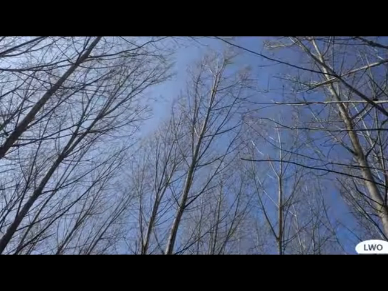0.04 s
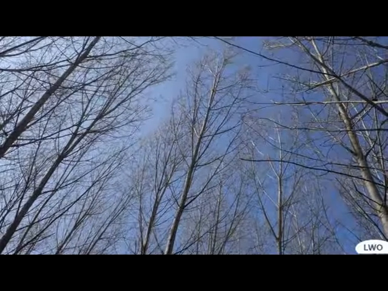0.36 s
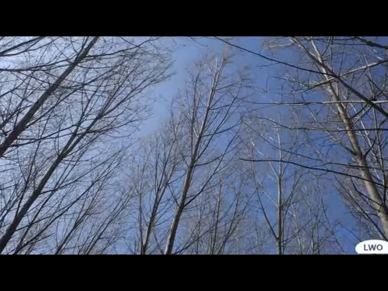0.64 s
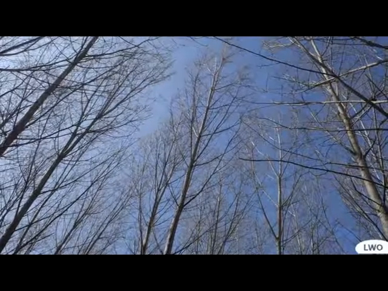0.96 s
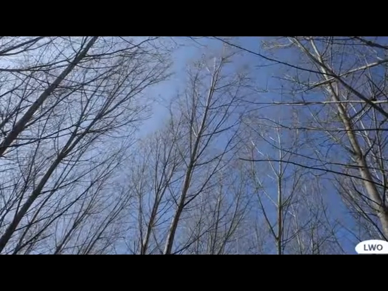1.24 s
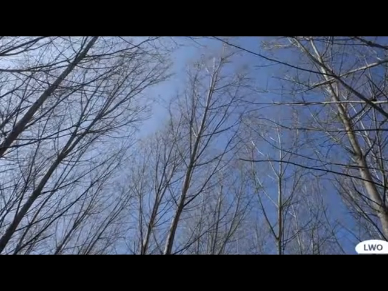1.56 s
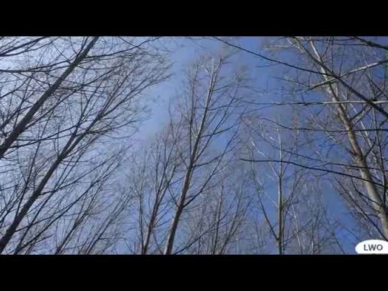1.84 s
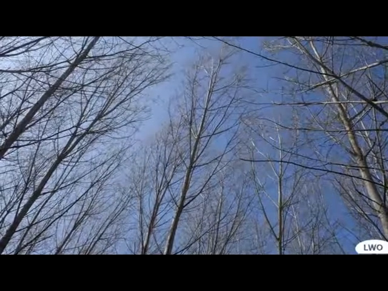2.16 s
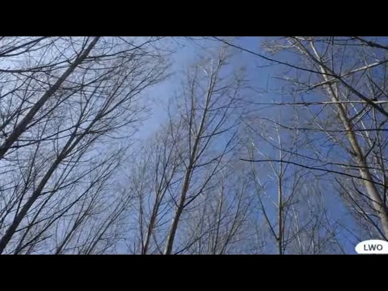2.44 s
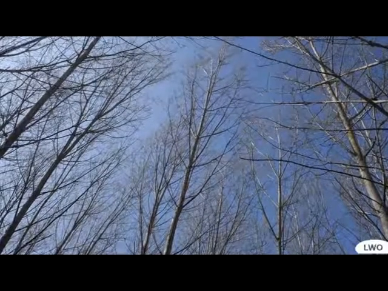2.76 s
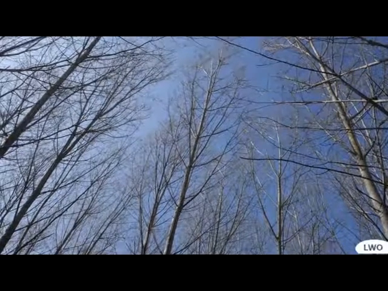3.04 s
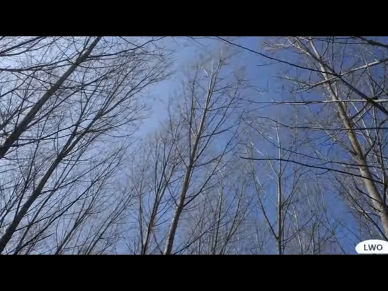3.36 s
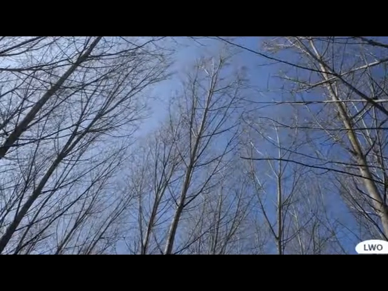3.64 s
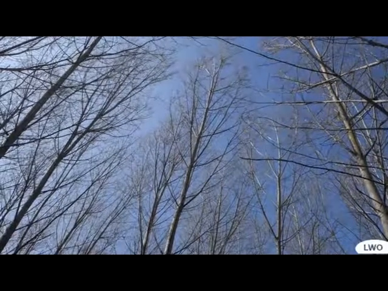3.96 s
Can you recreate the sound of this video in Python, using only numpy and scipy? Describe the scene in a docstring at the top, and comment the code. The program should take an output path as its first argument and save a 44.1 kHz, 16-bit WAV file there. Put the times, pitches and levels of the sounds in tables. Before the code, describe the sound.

Small birds chirp with short, high whistles and falling notes that ring among tall trees. The calls grow louder and busier as distant birds join, over a steady low rumble and a faint breeze.

```python
"""Small birds among tall bare trees. From the start: a distant rumble, coloured by its ground
reflection, the hiss of a light breeze, and calls that hook down onto a held whistle, many ending in
a falling slur. Twigs and trunks scatter each note into a long ringing tail. Faint high twitters pass
in the first second. From about 1.5 s the calls grow louder, and far birds, short pips and rough buzzes
stand out. Near 3.7 s one thin whistle sinks."""
import sys
import numpy as np
from scipy import signal
from scipy.fft import rfft, irfft
from scipy.io import wavfile
from scipy.ndimage import map_coordinates

SR = 44100
rng = np.random.default_rng(int(sys.argv[2]) if len(sys.argv) > 2 else 0)


def digitize_waveform(pressure):
    """Quantize a signal to 16-bit integers and store it at the path in sys.argv[1].

    Rows of a 2-D input are taken as channels; values are limited to [-1, 1].
    """
    field = np.atleast_2d(pressure).T
    bounded = np.clip(field, -1, 1)
    quanta = np.round(bounded * 32767).astype(np.int16)
    wavfile.write(sys.argv[1], SR, quanta)


N = 176400

# rumble spectrum: f/Hz, relative density/dB
RUMBLE_SPECTRUM = [(12, -18), (25, -22), (38, 0.5), (75, -0.5), (105, 0.5), (175, 1), (275, -1.5),
                   (350, -6), (480, -15), (700, -25), (1200, -65), (3000, -67)]
# rumble band gains: t/s, low/dB, middle/dB, upper/dB
RUMBLE_SWELL = [(0, 8, 3.5, 8.5), (.2, -5, 0, 2), (.45, 5, 2, -0.5), (.6, 0.5, 2.5, 1),
                (.85, 1, -3.5, -2.5), (1.25, 0, -0.5, 0), (1.7, -3, 1, -3.5), (2.2, -1, 1, -2),
                (2.6, 0.5, 2.5, -3.5), (2.9, 1.5, 0.5, 2.5), (3.35, -3.5, 1, 2), (4, -5, -0.5, -1.5)]
# soft drones in the rumble: peak t/s, f/Hz, Gaussian sigma/s, level/dB
DRONE_SWELLS = [(0.09, 95, 0.18, -49.5), (0.031, 272, 0.16, -45.5), (0.445, 264, 0.028, -44),
                (0.745, 166.7, 0.26, -49), (2.908, 316, 0.084, -54.5), (3.272, 273, 0.067, -54)]
# breeze spectrum: f/Hz, relative density/dB
BREEZE_SPECTRUM = [(30, -20), (90, -6), (180, 1.45), (350, 3), (700, 0), (1100, -3), (1600, -9),
                   (2300, -10), (2800, -14), (3400, -15), (5000, -17), (7500, -22), (10500, -26)]
# breeze, left-right likeness: f/Hz, correlation/1
BREEZE_CORRELATION = [(100, 1), (600, 0.74), (1100, 0.58), (2200, 0.18), (4000, 0.23), (10000, 0)]
# faint high sizzle: t/s, level/dB
SIZZLE_LEVEL = [(0, -98), (.13, -86), (.27, -83), (.5, -88), (.7, -100), (2.9, -100), (3.07, -87),
                (3.22, -82.5), (3.45, -103), (4, -100)]
# far birds, send to the wood: t/s, level/dB
FAR_LEVEL = [(0, -88), (1.6, -59), (2.1, -73), (2.45, -69), (2.75, -66), (3.05, -81), (3.6, -59), (4, -63)]
# rough distant twitters: t/s, f/Hz, length/s, level/dB
BUZZ_NOTES = [(1.763, 6000, 0.065, -72), (1.877, 5690, 0.06, -72), (2.205, 5830, .1, -72.5),
              (2.392, 5620, 0.065, -75), (2.584, 5480, 0.092, -70), (2.641, 4850, .1, -64.5),
              (2.707, 5900, 0.044, -69), (3.079, 5660, 0.045, -64), (3.358, 5200, 0.043, -70),
              (3.789, 4400, 0.078, -65)]
# faint high twitters: t/s, f/Hz, length/s, level/dB
TWITTER_NOTES = [(0.306, 7800, 0.043, -85), (.465, 7650, 0.05, -80), (.745, 7200, 0.038, -75)]
# thin sinking whistle: t/s, f/Hz, level/dB
THIN_CONTOUR = [(3.652, 8050, -79), (3.675, 7600, -73), (3.69, 7200, -74), (3.735, 6850, -70),
                (3.79, 6600, -73), (3.825, 6450, -71)]
# short plain notes: t/s, start f/Hz, end f/Hz, length/s, level/dB, pan (L-R)/dB
PIP_NOTES = [(1.751, 2760, 2720, 0.021, -67.5, 0), (1.927, 2780, 2740, 0.013, -64, 1),
             (2, 2780, 3130, 0.041, -73, -4), (2.502, 4020, 3980, 0.018, -59.5, 7),
             (2.559, 3030, 2830, 0.049, -67.5, -1), (3.197, 3893, 3825, 0.025, -58.5, 12),
             (3.251, 3090, 3110, 0.028, -66, 1), (3.574, 5150, 5330, 0.021, -64, 17),
             (1.208, 5900, 5030, 0.0091, -65, 0), (3.49, 3020, 2570, 0.012, -64.5, 3),
             (3.745, 3130, 2490, 0.027, -74, 0)]
# falling slurs: t/s, start f/Hz, end f/Hz, length/s, level/dB, echo send/dB
SLUR_NOTES = [(0.397, 4900, 3670, 0.04, -70, 6.5), (0.796, 4400, 3540, 0.03, -79, -2),
              (1.09, 5000, 3660, 0.041, -65, 5.5), (1.772, 4400, 3716, 0.03, -67, 4),
              (1.958, 5100, 3900, 0.032, -66, 4), (2.143, 4250, 3450, 0.028, -65, 2),
              (2.274, 4900, 4200, 0.0313, -65, 7.5), (2.42, 4950, 3650, 0.032, -59.5, 3.5),
              (2.633, 4900, 3900, 0.02, -63, 10.5), (2.665, 4800, 3900, 0.017, -63, 10),
              (2.862, 4900, 3950, 0.0332, -65, 5), (3.12, 4700, 3420, 0.045, -68, 3),
              (3.365, 5080, 3900, 0.035, -63, 4.5), (3.513, 3900, 3380, 0.026, -63.5, -1),
              (3.572, 4750, 3800, 0.022, -67, 1), (3.854, 4050, 3520, 0.025, -68, 0)]
# hooked calls: t/s, held f/Hz, length/s, level/dB, pan (L-R)/dB, echo send/dB,
# hook gain/(dB per octave above held f)
HOOKED_NOTES = [(0.02, 4450, 0.067, -72.5, 4, 3, -20), (0.141, 3990, 0.086, -72, 6, 0.5, -20),
                (0.322, 4070, 0.079, -67.5, -3, -2, -27), (0.356, 4950, 0.04, -69, 5, 7, 4),
                (0.719, 4380, 0.09, -67, 3, 5.5, 10), (0.774, 4000, 0.067, -74, 7, 4, -20),
                (1.052, 4950, 0.066, -71, 3, 8, -10), (1.2, 4000, .045, -68, 3, 4, -15),
                (1.405, 3970, 0.045, -61, 3, -2, -15), (1.445, 4000, .035, -59, 3, -6, -25),
                (1.559, 4340, .075, -58, 4.5, -10, 0), (1.724, 5650, 0.035, -66, 4, 6, -4),
                (1.835, 3920, 0.03, -65, 5, 2, -20), (1.911, 5170, 0.037, -69, 3, 3, 8),
                (1.935, 5670, 0.044, -67, -9, 5, -16), (2.074, 4330, 0.0624, -60, 7, 0.5, -10),
                (2.217, 4137, 0.051, -64.5, -7, 6, -10), (2.273, 4340, 0.08, -59, 3.5, -8.5, 4),
                (2.381, 4950, 0.036, -65.5, 8, 9.5, -10), (2.607, 4900, 0.045, -62, -5.5, 7, -1),
                (2.731, 3870, 0.07, -63, 9.5, -1, -10), (2.971, 4340, 0.075, -59, 5, -8, 5),
                (3.073, 5590, 0.029, -59.5, 7.5, -1.5, 0), (3.321, 5080, 0.058, -66, -4.5, -1.5, 6),
                (3.436, 3790, 0.078, -57.5, 12, -6, 3), (3.776, 4275, 0.058, -56.5, 7.5, -4, -2),
                (3.888, 5000, 0.034, -65, 7, -9, 4), (3.98, 3900, .04, -58, -4, 0, 3)]

TIME_S, BIN_HZ = np.arange(N) / SR, np.fft.rfftfreq(N, 1 / SR)
RUMBLE_LAG_S = 70e-6


def undb(db):
    """Decibels to gain."""
    return 10 ** (np.asarray(db) / 20)


def over_time(rows, col=1):
    """Time table column at every sample."""
    rows = np.array(rows)
    return np.interp(TIME_S, rows[:, 0], rows[:, col])


def over_frequency(rows):
    """Frequency table at every bin, on a log axis."""
    rows = np.array(rows)
    return np.interp(np.log(np.maximum(BIN_HZ, 1)), np.log(rows[:, 0]), rows[:, 1])


def walk(rate_hz, n):
    """Smooth random curve, spread near 1."""
    steps = rng.standard_normal(512)
    return map_coordinates(steps, [np.arange(n) / SR * rate_hz], order=3, mode="mirror")


def noise(gain):
    """Unit-rms noise with the given spectrum."""
    return irfft(rfft(rng.standard_normal(N)) * gain / np.sqrt(np.mean(gain ** 2)), N)


def narrow_noise(hz, sigma_hz):
    """Gaussian band of noise."""
    return noise(np.exp(-0.5 * ((BIN_HZ - hz) / sigma_hz) ** 2))


def lag_right(x, lag_s):
    """Stereo pair, right side delayed."""
    return np.array([x, irfft(rfft(x) * np.exp(-2j * np.pi * BIN_HZ * lag_s), N)])


def place(bus, start_s, note, pan_db=0, echo_db=0):
    """Add a note to left, right and echo send; pan sets level and arrival time."""
    i = int(start_s * SR)
    note = note[:N - i]
    lag_s = np.clip(13e-6 * pan_db, -80e-6, 80e-6)
    right = map_coordinates(note, [np.arange(len(note)) - lag_s * SR], order=3)
    gains = undb([pan_db / 2, -pan_db / 2, echo_db])
    bus[:, i:i + len(note)] += gains[:, None] * np.array([note, right, note])


def rumble(ground_delay_s=0.010995, ground_gain=0.42, gain_db=-48.5):
    """Far low noise, combed by its ground reflection; three bands swell over steady deep bass."""
    comb = np.abs(1 + ground_gain * np.exp(-2j * np.pi * BIN_HZ * ground_delay_s))
    spectrum = rfft(noise(undb(over_frequency(RUMBLE_SPECTRUM)) * comb))
    band = np.searchsorted([62, 110, 225], BIN_HZ)
    x = irfft(spectrum * (band == 0), N)
    for k in (1, 2, 3):
        x += irfft(spectrum * (band == k), N) * undb(over_time(RUMBLE_SWELL, k))
    return lag_right(undb(gain_db) * x, RUMBLE_LAG_S)


def drones():
    """Narrow swells in the distant rumble."""
    x = np.zeros(N)
    for peak_s, hz, sigma_s, db in DRONE_SWELLS:
        swell = undb(db) * np.exp(-0.5 * ((TIME_S - peak_s) / sigma_s) ** 2)
        x += narrow_noise(hz, sigma_hz=19.5) * swell
    return lag_right(x, RUMBLE_LAG_S)


def breeze(level_db=-58, pan_db=1.1):
    """Air hissing in the branches, wider in the treble."""
    gain = undb(over_frequency(BREEZE_SPECTRUM))
    correlation = over_frequency(BREEZE_CORRELATION)
    mid = irfft(rfft(noise(gain)) * np.sqrt((1 + correlation) / 2), N)
    side = irfft(rfft(noise(gain)) * np.sqrt((1 - correlation) / 2), N)
    return undb(level_db) * np.array([(mid + side) * undb(pan_db / 2), (mid - side) * undb(-pan_db / 2)])


def sizzle():
    """Thin high band that comes and goes twice."""
    return np.array([narrow_noise(hz=10730, sigma_hz=73) for _ in range(2)]) * undb(over_time(SIZZLE_LEVEL))


def wood(send, t60_s=1.15, build_s=0.02, trunk_share=0.23, gain_db=3.5):
    """Twigs scatter a dense tail, trunks return single echoes; one strong trunk echo answers late."""
    t = np.arange(2 * SR) / SR
    twigs = rng.standard_normal((2, len(t)))
    trunks = rng.standard_normal((2, len(t))) * (rng.random((2, len(t))) < 1 / 400) * np.sqrt(400)
    scatter = np.sqrt(1 - trunk_share) * twigs + np.sqrt(trunk_share) * trunks
    trunk_echo_db = 3.5 * np.exp(-0.5 * ((t - 0.11) / 0.004) ** 2)
    fade = undb(-60 * t / t60_s + trunk_echo_db) * (1 - np.exp(-t / build_s))
    response = scatter * fade / np.linalg.norm(fade)
    return undb(gain_db) * signal.fftconvolve(send[None], response, axes=1)[:, :N]


def sway(pair, shift_s=23e-6, rate_hz=50):
    """Echo paths shift slightly, so the tails flutter."""
    paths = [np.arange(N) + shift_s * SR * walk(rate_hz, N) for _ in pair]
    return np.array([map_coordinates(x, [path], order=3, mode="nearest") for x, path in zip(pair, paths)])


def perch(pair, t60_s=0.1, share=0.22):
    """Twigs close to the singers blur each note."""
    t = np.arange(int(t60_s * SR)) / SR
    fade = undb(-60 * t / t60_s)
    response = rng.standard_normal((2, len(t))) * fade / np.linalg.norm(fade)
    blur = signal.fftconvolve(pair, response, axes=1)[:, :N]
    return np.sqrt(1 - share) * pair + np.sqrt(share) * blur


def whistle(hz, envelope, edge_s=0.0034, fast_hz=83.7, slow_hz=55, flutter_db=1):
    """Near-pure bird tone, wavering in pitch and level."""
    n = len(hz)
    t = np.arange(n) / SR
    attack = np.minimum(t / edge_s, 1)
    release = np.sin(np.pi / 2 * np.minimum((n / SR - t) / edge_s, 1))
    waver = 1 + 0.0081 * walk(fast_hz, n) + 0.008 * walk(slow_hz, n)
    tone = np.sqrt(2) * np.sin(2 * np.pi * np.cumsum(hz * waver) / SR)
    return tone * envelope * attack * release * undb(flutter_db * walk(fast_hz, n))


def hook(held_hz, length_s, db_per_octave=0, top_hz=6950, fall_s=0.0075, attack_s=0.018):
    """Pitch drops fast onto a held note as the voice swells."""
    t = np.arange(int(length_s * SR)) / SR
    above_hz = (top_hz - held_hz) * np.exp(-(t / fall_s) ** 1.402)
    swell = 0.3 + 0.7 * np.minimum(t / attack_s, 1)
    hook_gain = undb(db_per_octave * np.log2(1 + above_hz / held_hz))
    return whistle(held_hz + above_hz, swell * hook_gain)


def far_birds(count=44):
    """Short hooked calls, one at random per time slot; echo send only."""
    bus = np.zeros((3, N))
    for slot, (offset, pitch, length) in enumerate(rng.random((count, 3))):
        note = hook(held_hz=3900 + 1100 * pitch, length_s=0.0068 + 0.023 * length)
        place(bus, (slot + offset) / count * N / SR, note)
    return bus[2] * undb(over_time(FAR_LEVEL))


def buzzes(swing_hz=520, rate_hz=90, unevenness=0.4):
    """Distant twitters, pitch shaken widely and unevenly; echo send only."""
    bus = np.zeros((3, N))
    for start_s, hz, length_s, db in BUZZ_NOTES:
        n = int(length_s * SR)
        cycles = np.cumsum(rate_hz * (1 + unevenness * walk(rate_hz, n))) / SR
        shake = np.sin(2 * np.pi * cycles) + unevenness * walk(rate_hz, n)
        place(bus, start_s, whistle(hz + swing_hz * shake, undb(db)))
    return bus[2]


def twitters(bus, swing_hz=230, rate_hz=42):
    """Tiny high notes with fast vibrato."""
    for start_s, hz, length_s, db in TWITTER_NOTES:
        t = np.arange(int(length_s * SR)) / SR
        note = whistle(hz + swing_hz * np.cos(2 * np.pi * rate_hz * t), undb(db))
        place(bus, start_s, note, echo_db=-4)


def thin_whistle(bus):
    """One high, sinking note."""
    times_s, hz, db = np.array(THIN_CONTOUR).T
    t = np.arange(times_s[0], times_s[-1], 1 / SR)
    note = whistle(np.interp(t, times_s, hz), undb(np.interp(t, times_s, db)))
    place(bus, times_s[0], note, pan_db=6, echo_db=-3)


def pips(bus):
    """Short notes on a straight glide."""
    for start_s, start_hz, end_hz, length_s, db, pan_db in PIP_NOTES:
        progress = np.linspace(0, 1, int(length_s * SR))
        hz = start_hz + (end_hz - start_hz) * progress
        envelope = undb(db) * np.minimum(progress / 0.11, 1)
        place(bus, start_s, whistle(hz, envelope), pan_db, echo_db=-4.5)


def slurs(bus, fade_db=-5):
    """Notes that fall and fade."""
    for start_s, start_hz, end_hz, length_s, db, echo_db in SLUR_NOTES:
        progress = np.linspace(0, 1, int(length_s * SR))
        hz = end_hz + (start_hz - end_hz) * np.exp(-(progress / 0.42) ** 2)
        envelope = undb(db + fade_db * progress ** 2)
        place(bus, start_s, whistle(hz, envelope), pan_db=3, echo_db=echo_db)


def hooked_calls(bus):
    """Main calls of the near birds, the hook faint or sharp."""
    for start_s, hz, length_s, db, pan_db, echo_db, db_per_octave in HOOKED_NOTES:
        place(bus, start_s, undb(db) * hook(hz, length_s, db_per_octave), pan_db, echo_db)


def scene():
    """Birds and their echoes over rumble and breeze."""
    bus = np.zeros((3, N))  # left, right, echo send
    for sing in (hooked_calls, slurs, pips, thin_whistle, twitters):
        sing(bus)
    direct = perch(bus[:2])
    echoes = sway(wood(bus[2] + far_birds() + buzzes()))
    return rumble() + drones() + breeze() + sizzle() + echoes + direct


def record(dry):
    """Steep low-pass at 11.1 kHz."""
    return signal.sosfilt(signal.ellip(10, 0.2, 70, 11100, fs=SR, output="sos"), dry)


dry = scene()
out = record(dry)
digitize_waveform(out)
```